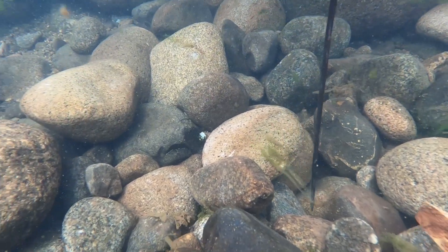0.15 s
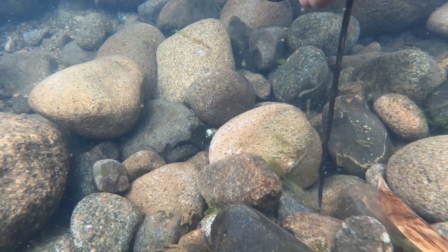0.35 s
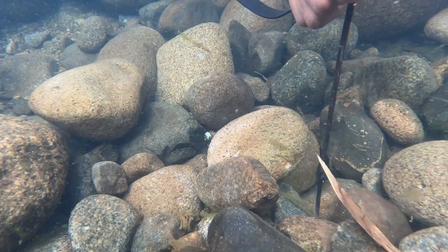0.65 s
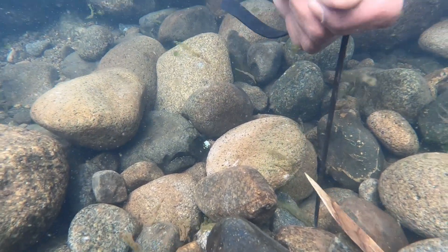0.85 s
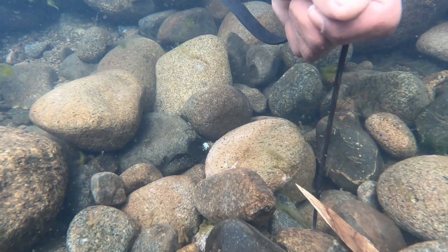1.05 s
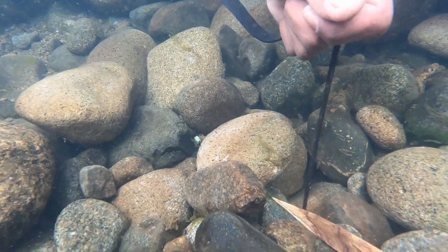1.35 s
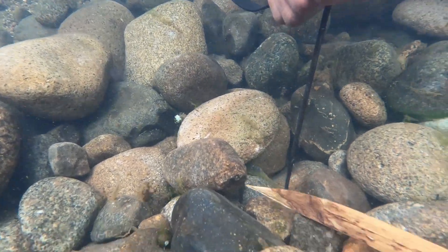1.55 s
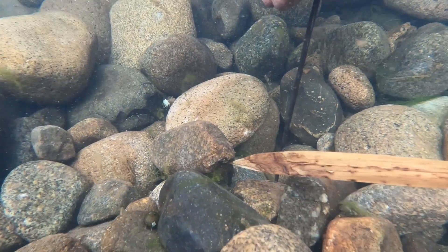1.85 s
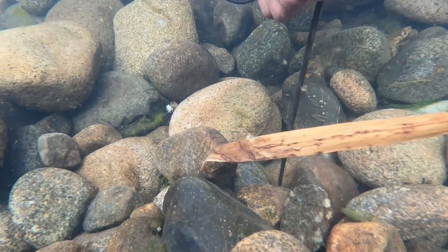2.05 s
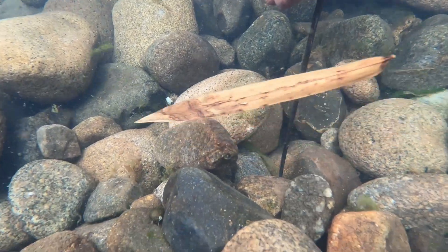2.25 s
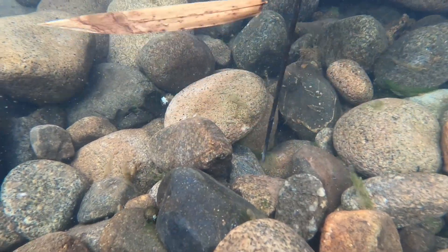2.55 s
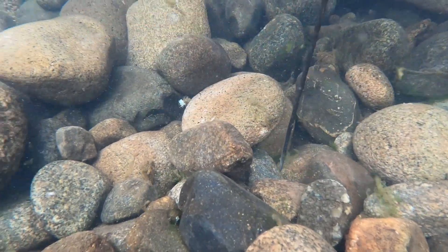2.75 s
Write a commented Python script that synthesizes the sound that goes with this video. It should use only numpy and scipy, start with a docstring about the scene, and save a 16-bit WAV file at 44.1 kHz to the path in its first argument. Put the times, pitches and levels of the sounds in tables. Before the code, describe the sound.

Muffled hollow bumping and dragging on a small housing under a shallow river. Quiet trickling grit and tiny bubbles open, with a sharp double knock at 0.4 s. From 0.75 s a thud starts an uneven mid-low hum, strongest near 0.9 s, easing by 1.6 s. Knocks cluster around 1.45 s and 1.9 s; gritty crackle and a strong bump come at 2.2-2.3 s, then fading rubs, clicks and a low thud at 2.8 s.

```python
"""Housing in a stony river

A small waterproof housing lies under a shallow stony river. Something drags along it and knocks it, so its
hollow body hums: uneven jolts and soft pushes ring its resonances. The current rolls grit in swells, made of
random clicks through the microphone port. Bubbles and pebbles ping as fading sines, pebbles snap as noise
bursts, and eddies rumble and thud on the microphone as low noise and low sines. A faint hiss lies below.
"""
import sys
import numpy as np
from scipy import signal
from scipy.fft import rfft, irfft
from scipy.io import wavfile
from scipy.ndimage import uniform_filter1d

SR = 44100
rng = np.random.default_rng(int(sys.argv[2]) if len(sys.argv) > 2 else 0)


def linear_from_db(decibels):
    """Turn decibels (scalar or array-like) into linear amplitude factors; 0 gives 1."""
    return 10 ** (np.asarray(decibels, float) / 20)


def generate_wav(sig):
    """Save sig (samples, or channels by samples) to the path in sys.argv[1] as 16-bit PCM at SR."""
    pcm = np.round(np.clip(np.atleast_2d(sig).T, -1, 1) * 32767).astype(np.int16)
    wavfile.write(sys.argv[1], SR, pcm)


N = 127890  # length in samples, 2.9 s
GRAIN_CAP = 4.2  # the largest grain, counted in spreads
PING_ROUGH = 0.24  # pitch shake of pings and fizz, in radians of phase; their size shakes by half this share


def level(x, db):
    """Scale to an rms level in dB."""
    return x * linear_from_db(db) / np.sqrt(np.mean(x ** 2))


def curve(rows, column=1):
    """One column of a control table, joined by straight lines."""
    rows = np.array(rows)
    return np.interp(np.arange(N) / SR, rows[:, 0], rows[:, column])


def ring(modes, order=2):
    """Impulse response of a set of resonances with steep skirts; it starts at once and then dies away."""
    f = np.fft.rfftfreq(32768, 1 / SR)
    power = sum(linear_from_db(db) ** 2 / (1 + (2 * (f - hz) / width) ** 2) ** order for hz, width, db in modes)
    # Folding the cepstrum (the transform of the log spectrum) forward in time gives minimum phase.
    cepstrum = irfft(np.log(power + 1e-14) / 2)
    cepstrum[1:16384] *= 2
    cepstrum[16385:] = 0
    response = irfft(np.exp(rfft(cepstrum)))[:8192]
    return response / np.abs(response).max()


def through(x, response):
    """Pass a sound through a response, keeping its length."""
    return signal.fftconvolve(x, response)[:N]


def walk(rate):
    """Random levels held 1 / rate s and smoothed twice; spread near 1."""
    hold = int(SR / rate)
    steps = np.repeat(rng.standard_normal(N // hold + 1), hold)
    return 1.3 * uniform_filter1d(uniform_filter1d(steps, hold), hold)[:N]


def grains(rate, spread_db):
    """Random small clicks of very uneven size and random sign."""
    u = rng.random((3, N))
    size_db = spread_db * np.minimum(-np.log(1 - u[2]), GRAIN_CAP)
    return (u[0] < rate / SR) * np.sign(u[1] - .5) * linear_from_db(size_db)


def tones(rows, glide, rise_s, rough):
    """Fading sines that glide in pitch by twice the glide share, shaken in pitch and size."""
    out = np.zeros(N + SR)
    size_shake, pitch_shake = rough * np.array([np.tile(walk(900), 2), np.tile(walk(900), 2)])
    for start_s, db, hz, t60 in rows:
        t60 = max(t60, .002)
        t = np.arange(min(int(t60 * SR), SR - 1)) / SR
        i = max(int(start_s * SR), 0) + np.arange(len(t))
        j = (i + int(hz)) % N  # each pitch reads another stretch of the shake
        phase = 2 * np.pi * hz * t * (1 + glide * t / t60) + pitch_shake[j]
        wave = (1 + size_shake[j] / 2) * np.sin(phase)
        fade = (1 - np.exp(-t / rise_s)) * 1000. ** (-t / t60)
        out[i] += linear_from_db(db) * fade * wave
    return out[:N]


# Resonances of the hollow housing. Each row: pitch in Hz, width in Hz, height in dB.
BODY_MODES = [(137, 40, -19.5), (317.8, 97, -15.5), (389.3, 53.7, 0), (435.8, 69, 0), (492.4, 65, -4),
              (565.3, 56, -11), (614.6, 26, -14.5), (841.8, 94, -21.5), (1130, 67, -29), (1400, 140, -30.5),
              (1580, 140, -24.5), (2244, 73, -41), (3056, 1000, -55.5), (6300, 1500, -69)]
# How hard something drags on the housing. Each row: time in seconds, level in dB before the flicker.
DRAG_LEVEL = [(0, -30.5), (.05, -49), (.3, -42), (.4, -39.5), (.47, -37.5), (.53, -50), (.731, -45.5),
              (.737, -23), (.78, -20.5), (.9, -16), (1.1, -20), (1.3, -21), (1.45, -24), (1.56, -25),
              (1.65, -36.5), (1.72, -32), (1.84, -32), (1.95, -26.5), (2.1, -29.5), (2.24, -23),
              (2.29, -26), (2.37, -25.5), (2.48, -26.5), (2.6, -28.5), (2.7, -35.5), (2.77, -46.5),
              (2.82, -36.5), (2.9, -41)]


def drag(body):
    """Dense stick-slip jolts shake the housing unevenly, and its hollow body hums."""
    jolts_per_s, spread_db, flicker_db = 6000, 2, 1.4
    strength_db = curve(DRAG_LEVEL) + flicker_db * walk(30.095)
    jolts = grains(jolts_per_s, spread_db) * linear_from_db(strength_db)
    # An even run of jolts gives the loudness that counts as 0 dB.
    steady = through(grains(jolts_per_s, spread_db), body)
    return through(jolts, body) / np.sqrt(np.mean(steady ** 2))


# Knocks on the housing. Each row: start in seconds, peak of the hum in dB, level of the tick in dB
# relative to that peak (before the port), length of the push in seconds.
KNOCK_EVENTS = [(0, -23.5, -16, 0.0011), (0.018, -33.5, -4.5, 0.0049), (0.171, -32.5, -21, 0.0063),
                (.404, -14, -14.5, 0.0012), (0.426, -9, -20.5, 0.0045), (0.448, -24.5, -17, 0.0046),
                (0.462, -21.5, -19, 0.0022), (.543, -20.5, -22, 0.00074), (0.734, -19.5, -25.5, 0.0015),
                (.756, -10.5, -32, .015), (1.412, -16.5, -40, 0.027), (1.463, -13, -21, 0.014),
                (1.5, -24.5, -6, .002), (1.522, -15.5, -25, 0.016), (1.855, -23, -15, 0.0038),
                (1.87, -16.5, -16, 0.0014), (1.936, -27, -14, 0.0015), (2.082, -16.5, -13.5, 0.012),
                (2.303, -7, -39, 0.014), (2.466, -23, -29, 0.01), (2.538, -19.5, -24, 0.0062),
                (2.797, -23.5, -8, 0.0016), (2.81, -45, -9, 0.0019), (2.852, -25, -25, .015)]


def knocks(body, port):
    """Each knock rings the body, a long push only its main hum; the hard contact ticks in the port."""
    push_hz, tick_decay_s = 444, .0015
    out, ticks = np.zeros(N + SR), np.zeros(N)
    for start_s, db, tick_db, push_s in KNOCK_EVENTS:
        i = int(start_s * SR)
        t = np.arange(max(int(push_s * SR), 8)) / SR
        push = np.hanning(len(t)) * np.cos(2 * np.pi * push_hz * t)
        blow = np.convolve(push, body)
        out[i:i + len(blow)] += linear_from_db(db) * blow / np.abs(blow).max()
        ticks[i] = linear_from_db(db + tick_db)
    fade = np.exp(-np.arange(800) / SR / tick_decay_s)
    crunch = rng.standard_normal(N) * through(ticks, fade) / np.sqrt(tick_decay_s * SR / 2)
    return out[:N] + through(crunch, port)


# Ring of grit and water in the microphone port. Each row: pitch in Hz, width in Hz, height in dB.
PORT_MODES = [(716, 300, -6.5), (1312, 76, 1.5), (1658, 180, 4.5), (1920, 263, 2), (2375, 490, -10.5),
              (2930, 300, -17.5), (3364, 810, -19), (4403, 710, -33), (5950, 1700, -31),
              (8170, 1400, -41.5), (9680, 850, -44), (12200, 4000, -62.5)]
# Grit carried by the current. Each row: time in seconds, level in dB, treble boost or cut in dB.
GRIT_SWELLS = [(0, -49.5, 10.5), (.16, -50.5, 0.5), (.3, -55, 8), (.345, -53, 6), (.36, -43.5, -7.5),
               (.41, -39.5, -18), (.46, -53.5, -12), (.54, -49.5, 6), (.58, -46.5, -7), (.68, -55.5, 9.5),
               (.735, -43.5, 1), (.78, -56, -8.5), (1.12, -50.5, 1.5), (1.18, -37, 7), (1.22, -33, 4.5),
               (1.245, -37.5, 1), (1.26, -38, 3), (1.3, -46.5, 2), (1.48, -46, -3), (1.6, -52, -6.5),
               (1.75, -51.5, 5.5), (1.95, -42.5, 2.5), (2.05, -42.5, 4.5), (2.14, -34, 0.5),
               (2.165, -32, 1), (2.182, -25, -0.5), (2.195, -29.5, 4), (2.22, -24, -3), (2.24, -27.5, 0),
               (2.26, -43, 5.5), (2.45, -55, 5), (2.56, -47.5, 4), (2.66, -38, 0.5), (2.76, -50, 2),
               (2.81, -44, -2), (2.9, -48.5, 3)]


def grit():
    """Sand grains strike the port in flurries, each resonance patchy on its own, as the treble comes and goes."""
    hits_per_s, spread_db, flicker_db, treble_hz = 4600, 3.5, 2.12, 4000
    patchy_db, patches_per_s = 3.5, 130
    # Above the calm level, resonances below low_hz lag behind the swell by this share of its dB.
    calm_db, low_hz, low_lag = -46.5, 1500, .4
    hits = grains(hits_per_s, spread_db) * linear_from_db(flicker_db * walk(70))
    swell_db = curve(GRIT_SWELLS)
    sand = 0
    for k, (hz, width, db) in enumerate(PORT_MODES):
        patchy_hits = hits * linear_from_db(patchy_db * walk(patches_per_s))
        band = through(patchy_hits, ring([(hz, 1.46 * width, 0)], order=3))
        band = level(band, db + 10 * np.log10(width))  # a wider resonance holds more power
        if hz < low_hz:
            band = band * linear_from_db(-low_lag * np.maximum(swell_db - calm_db, 0))
        sand = sand + (-1) ** k * band  # neighbours get opposite signs
    sand = level(sand, 0)
    treble = signal.sosfilt(signal.butter(2, treble_hz, "high", fs=SR, output="sos"), sand)
    return linear_from_db(swell_db) * (sand + (linear_from_db(curve(GRIT_SWELLS, column=2)) - 1) * treble)


# Single pings. Each row: start in seconds, level in dB before rise and fade, starting pitch in Hz,
# time to fade by 60 dB in seconds.
PING_EVENTS = [(0.004, -35.5, 662, 0.08), (0.404, -19.5, 735, 0.023), (0.499, -33.5, 750, 0.076),
               (1.444, -29, 722, 0.038), (0.0847, -37, 1400, 0.044), (0.1476, -44, 1290, 0.035),
               (0.1955, -28.5, 1920, 0.043), (0.386, -47, 1840, 0.023), (0.4035, -19, 1740, 0.012),
               (0.598, -37.5, 1280, 0.077), (0.6789, -34, 1700, 0.027), (0.7228, -30, 1890, 0.039),
               (1.4451, -28, 1580, 0.027), (1.501, -21, 1386, 0.035), (1.6377, -29, 1930, 0.025),
               (1.7355, -36.5, 1320, 0.044), (1.7843, -24.5, 1860, 0.029), (1.8652, -24.5, 1860, 0.042),
               (1.9375, -27.5, 1540, 0.028), (2.5406, -43.5, 1980, 0.031), (2.7102, -27, 1930, 0.034),
               (2.7955, -32, 1370, 0.058), (0.1291, -38.5, 2850, 0.02), (0.194, -36, 2360, 0.024),
               (0.2698, -42.5, 2970, 0.033), (0.3481, -53, 2570, 0.024), (0.3631, -29.5, 2726, 0.025),
               (0.4294, -31.5, 2590, 0.03), (0.5422, -42, 2470, 0.022), (0.5586, -37, 2520, 0.019),
               (0.822, -33.5, 2680, 0.026), (1.2126, -46, 2460, 0.021), (1.5514, -39.5, 3420, 0.033),
               (1.7504, -49, 2820, 0.031), (1.7833, -40, 3200, 0.03), (2.2209, -42, 2680, 0.027),
               (2.3166, -53, 2490, 0.024), (2.576, -34, 2340, 0.028), (2.6738, -31, 2470, 0.019),
               (2.799, -45, 2640, 0.021), (0.3496, -60, 4400, 0.014), (0.5432, -29.5, 4570, 0.012),
               (0.623, -56, 4740, 0.018), (0.6699, -51, 4500, 0.029), (0.83, -50.5, 4420, 0.018),
               (1.0505, -48.5, 4430, 0.018), (1.5234, -55.5, 4000, 0.018), (1.5234, -44, 4360, 0.023),
               (1.7659, -64, 4520, 0.018), (1.9784, -47, 4400, 0.018), (2.152, -50, 4260, 0.018),
               (2.1819, -38, 4400, 0.02), (2.2189, -29, 4250, 0.018), (2.797, -51, 4200, 0.018),
               (0.0588, -49, 6600, 0.01), (0.1486, -47, 6100, 0.01), (0.4269, -41, 5800, 0.01),
               (0.5432, -39.5, 5700, 0.01), (1.4805, -48.5, 5770, 0.01), (1.6696, -55, 5730, 0.012),
               (1.8223, -51, 5800, 0.01), (2.0512, -45, 5800, 0.01), (2.1485, -47, 6120, 0.01),
               (2.1844, -53, 5300, 0.01), (2.1844, -37, 6340, 0.011), (2.1979, -35, 6000, 0.013),
               (2.2298, -35, 6300, 0.01), (2.6179, -47.5, 6350, 0.0092), (2.7492, -49, 5870, 0.0083),
               (2.8694, -51, 5900, 0.01), (0.1486, -54, 8190, 0.008), (1.053, -56.5, 7380, 0.008),
               (1.1298, -67.5, 7210, 0.008), (1.6417, -54, 7890, 0.008), (1.6661, -51, 8030, 0.008),
               (1.697, -55, 8160, 0.008), (1.8537, -60, 8250, 0.008), (1.9066, -58, 8030, 0.008),
               (2.1475, -55, 9360, 0.008), (2.1844, -54, 7730, 0.008), (2.3635, -62, 8020, 0.008),
               (2.8699, -53, 9830, 0.008)]


def pings():
    """Small bubbles and pebbles ring as short sines that rise a little in pitch while they fade."""
    return tones(PING_EVENTS, glide=0.024, rise_s=0.00052, rough=PING_ROUGH)


# Tiny random pings: bubbles, then sand ticks. Each row: pings per second, least level in dB at 2 kHz,
# tilt in dB per octave, spread in dB, cycles until 60 dB down, lowest Hz, highest Hz.
FIZZ_KINDS = [(398, -49, -7.5, 3, 49.4, 1200, 4500), (350, -47.5, -6.5, 3.5, 15, 5600, 10500)]


def fizz():
    """Many tiny bubbles and sand ticks ring at random pitches, the small (high) ones fainter."""
    out = 0
    for rate, least_db, tilt_db, spread_db, cycles, low_hz, high_hz in FIZZ_KINDS:
        u = rng.random((1500, 4))
        u = u[u[:, 3] < rate * N / SR / 1500]  # keep about as many as the rate asks for
        start_s = u[:, 0] * N / SR
        hz = low_hz * (high_hz / low_hz) ** u[:, 1]
        extra_db = spread_db * np.minimum(-np.log(1 - u[:, 2]), GRAIN_CAP)
        db = least_db + tilt_db * np.log2(hz / 2000) + extra_db
        out = out + tones(zip(start_s, db, hz, cycles / hz), 0.045, 0.0011, PING_ROUGH)
    return out


# Pebble snaps. Each row: start in seconds, peak in dB, centre in Hz.
SNAP_EVENTS = [(.148, -59, 6490), (.165, -53, 7400), (.404, -26, 1290), (.427, -48.5, 5500),
               (.543, -37, 4440), (.737, -41, 3510), (1.052, -51, 5600), (1.212, -44, 4460),
               (1.257, -49, 5500), (1.446, -39, 3000), (1.514, -49.5, 5030), (1.668, -54, 6470),
               (1.696, -54, 7000), (1.854, -52, 7500), (1.958, -52, 5960), (2.149, -45, 5500),
               (2.184, -47, 6500), (2.198, -40, 6480), (2.231, -38.5, 5440), (2.382, -52, 4000),
               (2.425, -54, 5450), (2.62, -47, 5870), (2.672, -42, 2980), (2.749, -44.5, 5000),
               (2.798, -50, 4500), (2.87, -53.5, 7600)]


def snaps():
    """Pebbles click together: a short, wide burst of noise each."""
    decay_s, edge_ratio = 0.0015, 1.55  # fade of the noise; upper band edge over lower
    out, t = np.zeros(N + SR), np.arange(600) / SR
    for (start_s, db, hz), noise in zip(SNAP_EVENTS, rng.standard_normal((len(SNAP_EVENTS), 600))):
        edges = hz * edge_ratio ** np.array([-.5, .5])
        band = signal.butter(2, edges, "band", fs=SR, output="sos")
        burst = signal.sosfilt(band, noise * np.exp(-t / decay_s))
        i = int(start_s * SR)
        out[i:i + 600] += linear_from_db(db) * burst / np.abs(burst).max()
    return out[:N]


# Strength of the eddies. Each row: time in seconds, level in dB.
EDDY_LEVEL = [(0, -45.5), (.26, -47.5), (.3, -37.5), (.48, -38.5), (.55, -49), (.72, -49), (.77, -37),
              (.95, -48), (1.1, -56.5), (1.2, -52.5), (1.26, -46), (1.55, -43), (1.75, -47), (2, -39.5),
              (2.18, -38), (2.29, -39.5), (2.34, -42.5), (2.5, -40.5), (2.6, -42.5), (2.78, -40.5),
              (2.81, -27.5), (2.9, -51)]
# Tone of the eddies. Each row: pitch in Hz, width in Hz, height in dB.
EDDY_MODES = [(25, 34, 0), (42.55, 72, 1.5), (83, 22, -6.5), (114.4, 36, 1.5), (160, 100, -12.5),
              (222, 61, -18)]
# Thuds. Each row: start in seconds, level in dB before rise and fade, starting pitch in Hz,
# time to fade by 60 dB in seconds.
THUD_EVENTS = [(0.3, -30, 119, 0.14), (0.349, -33, 99, 0.17), (0.379, -27.5, 124.6, 0.14),
               (0.753, -18.5, 154, 0.15), (0.927, -32, 120.6, 0.15), (1.867, -27.5, 159, 0.1),
               (2.249, -23.5, 44, 0.19), (2.368, -37, 45.6, 0.18), (2.739, -42, 167, 0.14),
               (2.799, -33, 40, 0.19), (2.821, -25, 52.6, 0.18)]


def eddies():
    """Turbulence pushes the membrane in lumps, with a few distinct thuds that sink in pitch."""
    swirl = rng.standard_normal(N) * linear_from_db(2.4 * walk(11))
    rumble = level(through(swirl, ring(EDDY_MODES)), 0) * linear_from_db(curve(EDDY_LEVEL))
    return rumble + tones(THUD_EVENTS, glide=-0.066, rise_s=0.0021, rough=0)


def scene():
    """All sources at one microphone."""
    body, port = ring(BODY_MODES), ring(PORT_MODES)
    housing = drag(body) + knocks(body, port)
    river = grit() + pings() + fizz() + snaps() + eddies()
    return (housing + river)[None]


def preamp_hiss():
    """Faint preamp noise, dull above 7 kHz."""
    lowpass = signal.butter(2, 7000, fs=SR, output="sos")
    return level(signal.sosfilt(lowpass, rng.standard_normal(N)), -82.5)


def roll_off(x):
    """The treble ends steeply here."""
    return signal.sosfilt(signal.butter(12, 15480, fs=SR, output="sos"), x)


def record(dry):
    """Add the faint preamp hiss and finish the sound."""
    mix = dry + preamp_hiss()
    return roll_off(mix)


dry = scene()
out = record(dry)
generate_wav(out)
```